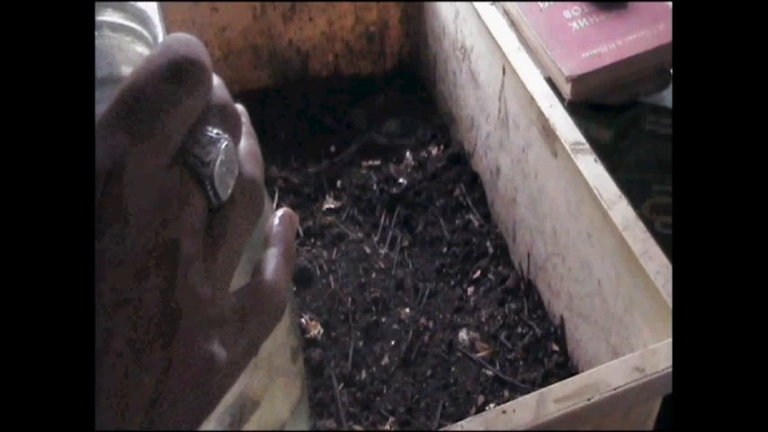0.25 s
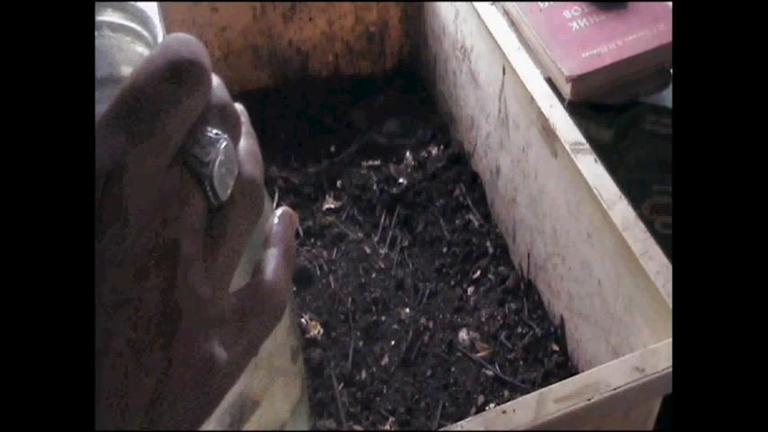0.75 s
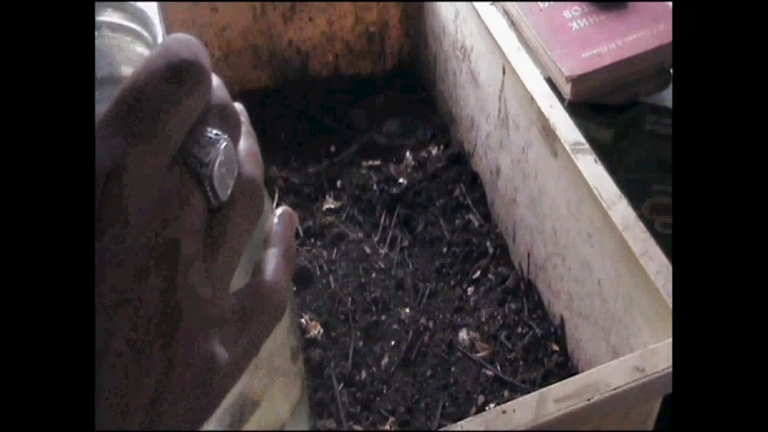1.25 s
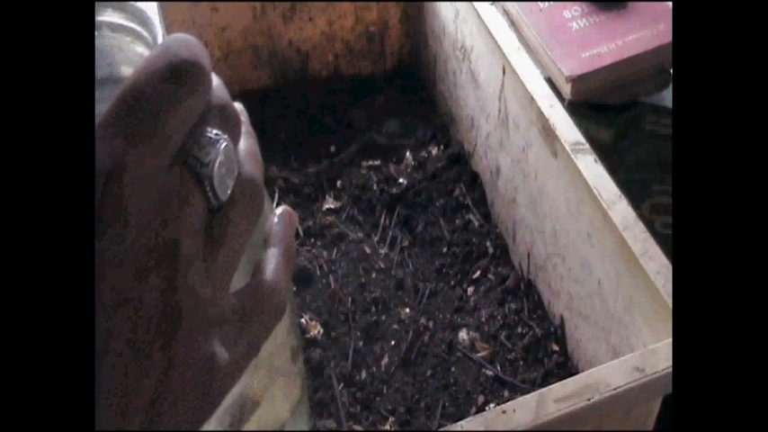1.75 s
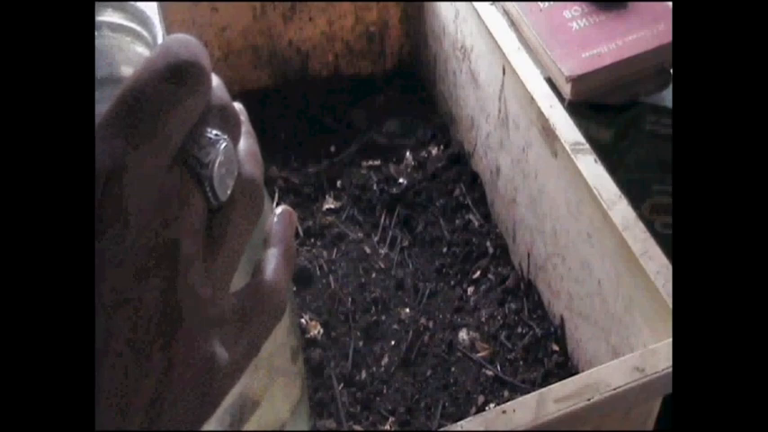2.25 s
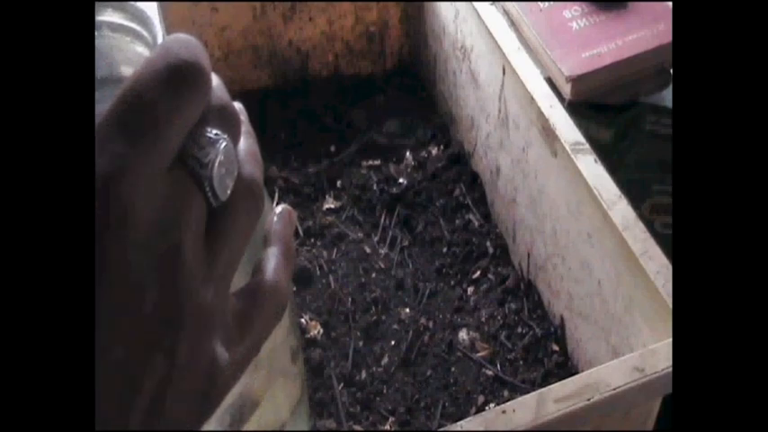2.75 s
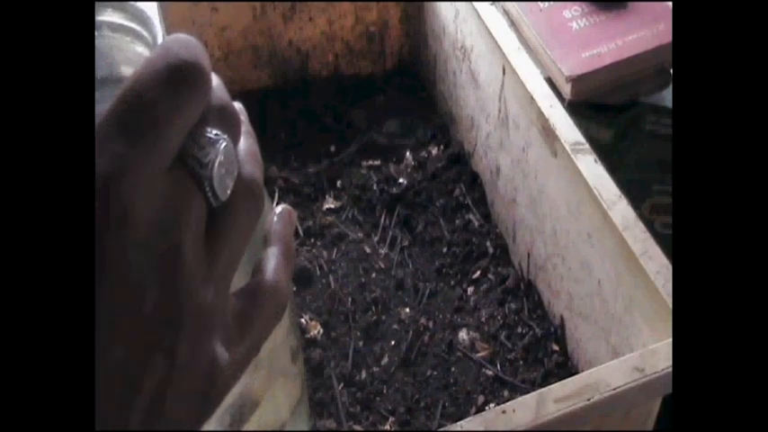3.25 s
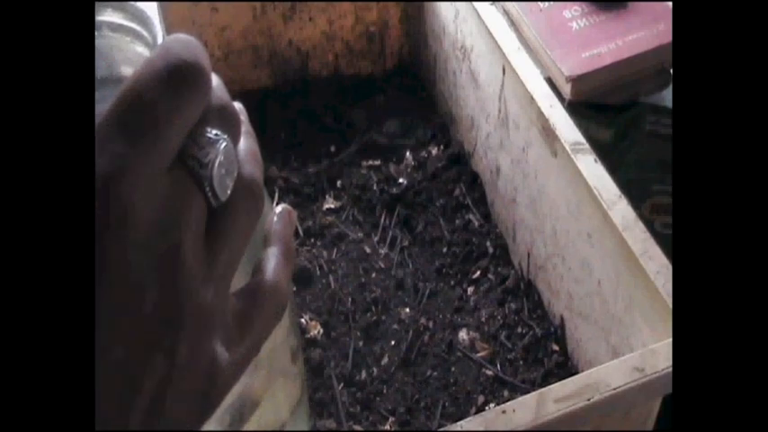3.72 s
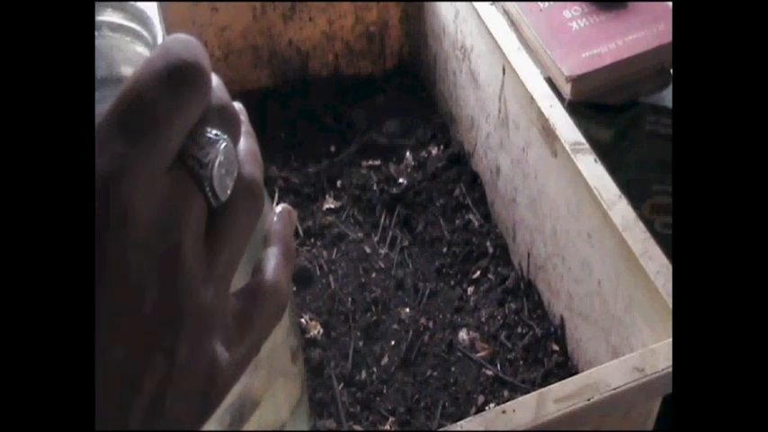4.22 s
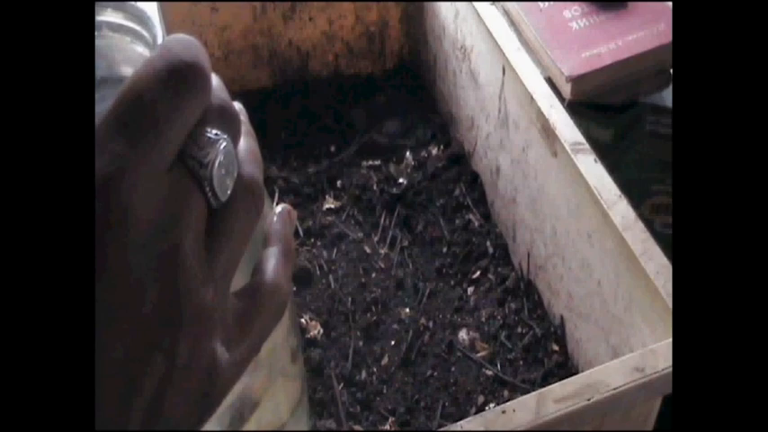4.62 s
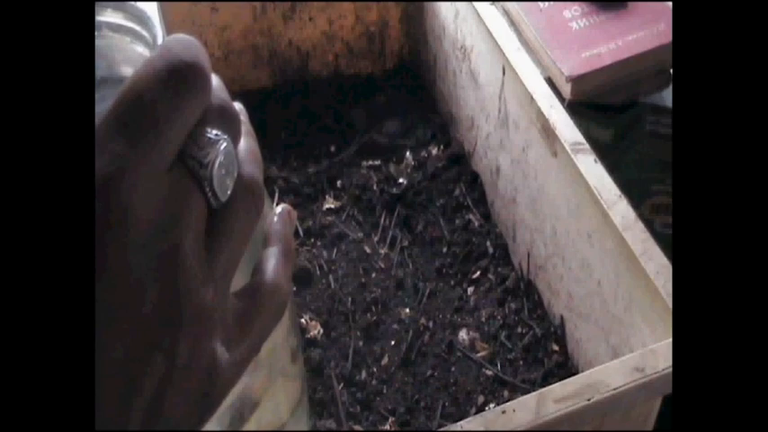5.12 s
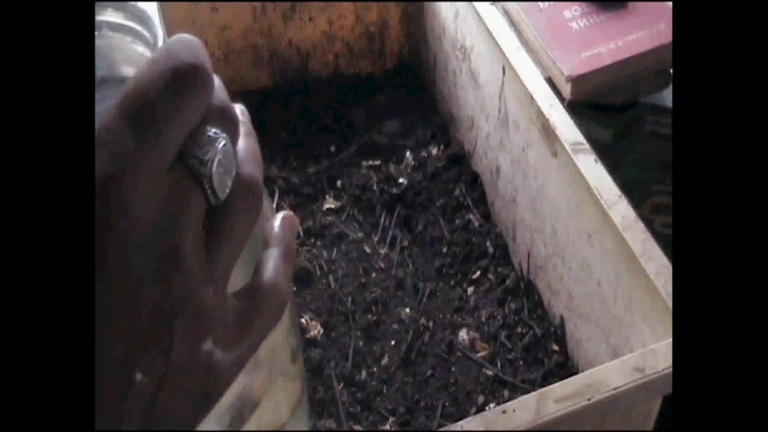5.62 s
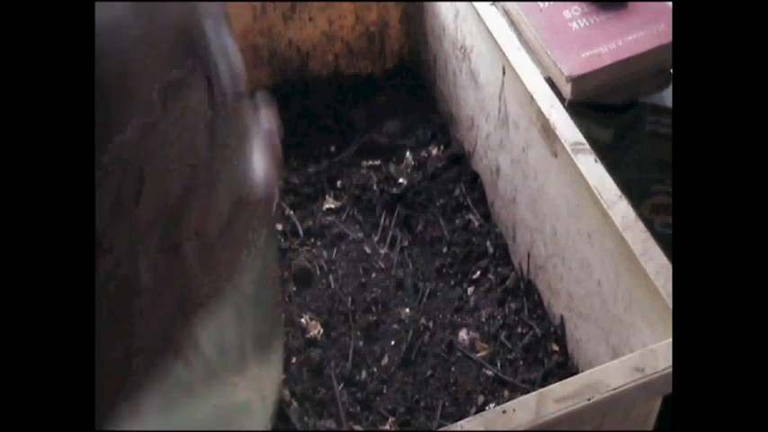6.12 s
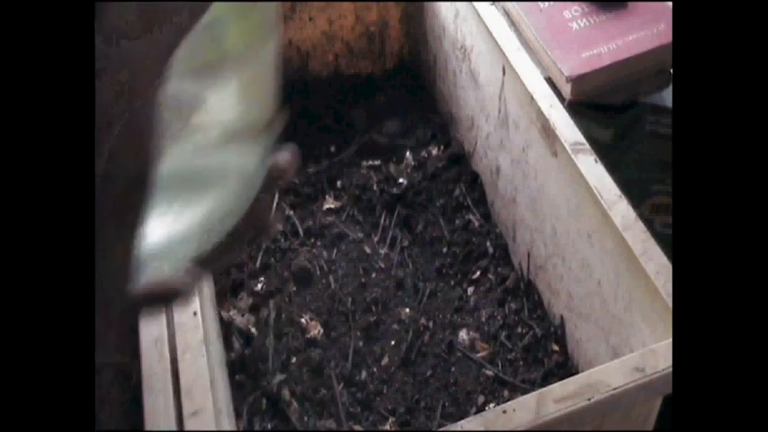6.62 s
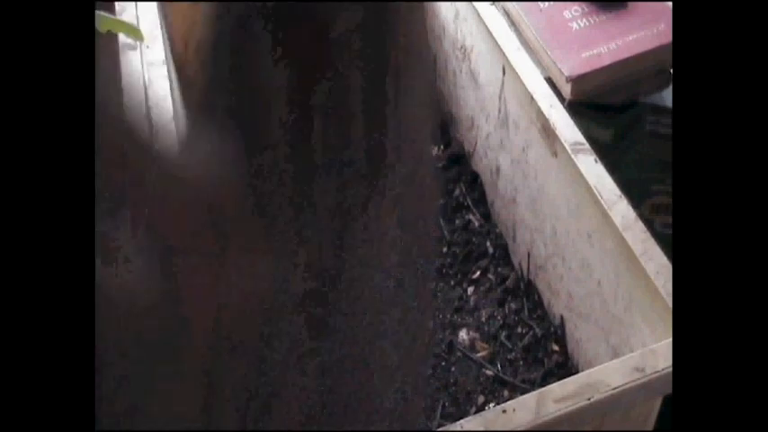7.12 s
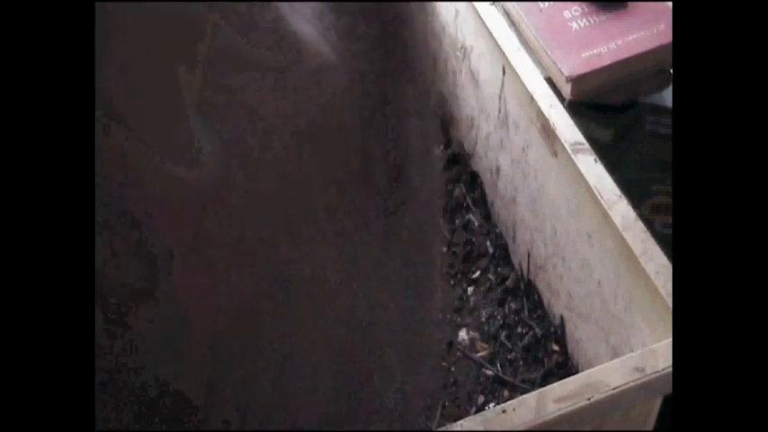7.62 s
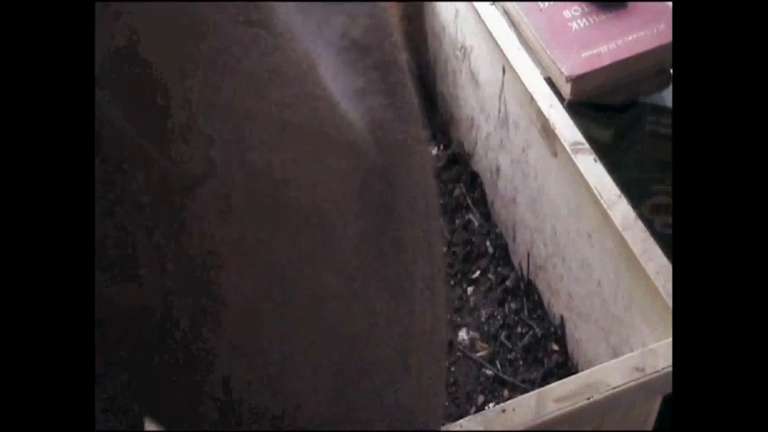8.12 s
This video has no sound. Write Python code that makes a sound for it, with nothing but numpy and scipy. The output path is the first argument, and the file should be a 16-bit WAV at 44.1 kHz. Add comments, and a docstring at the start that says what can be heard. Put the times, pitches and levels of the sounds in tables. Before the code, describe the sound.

Indoors, close to a box of damp soil, a faint bed of low rumble, hiss, fluttering motor whine and very thin high whistle runs throughout. From 0 to 1.6 s a weak fizz fades into lone ticks and tiny pips. A soft bump at 1.65 s and a duller one at 1.95 s lead into gushes of water: bright fizzing, crackling and sharp drip snaps to about 3.4 s, with short squeaks near 2.3-2.5 s. It thins to light seeping and ticks until 5 s. Stronger pours patter at 5.0-5.5 s, with a hollow plastic bottle boom at 5.27 s, and the brightest burst comes at 5.85-6.1 s with loud snaps, bumps and a squeak. Crackling drains away; clicks and squeaks follow at 7.2-7.4 s, a short hard ringing clink at 7.47 s, a soft thud at 7.77 s, then sparse drips to 8.3 s.

```python
"""Watering damp soil in a wooden box

Water from a plastic bottle soaks in close to a small camera indoors. Wet crumbs fizz and crackle as random
snaps and tone bursts that swell with each pour; strong pours patter, single drips snap and ring.
Shaped noise makes the bumps on the box, decaying modes the bottle's boom and a hard clink, glides the squeaks.
Under it lie noise rumble and hiss, a fluttering motor whine and a thin whistle.
"""
import sys
import numpy as np
from scipy import signal
from scipy.fft import rfft, irfft
from scipy.io import wavfile
from scipy.ndimage import uniform_filter1d

SR = 44100
rng = np.random.default_rng(int(sys.argv[2]) if len(sys.argv) > 2 else 0)


def store_wav(level_fs):
    """Save 16-bit WAV to argv[1]."""
    pcm = np.round(np.clip(np.atleast_2d(level_fs), -1, 1) * 32767)
    wavfile.write(sys.argv[1], SR, pcm.T.astype(np.int16))


N = 369116
T = np.arange(N) / SR

# colour of the microphone behind its port: (frequency [Hz], gain [dB])
PORT_RESPONSE = [(2200, 5.5), (2700, -11.5), (3400, 5), (3900, -3), (4500, 7.5), (5600, -7), (7200, -7.5),
                 (8100, 3.5), (9900, -11.5), (10400, -5), (10900, -9.5), (12300, 4), (14000, 8.5),
                 (15500, 1)]


def undb(db):
    """Decibels to gain."""
    return 10 ** (np.asarray(db) / 20)


def unit(x):
    """Scale to rms 1."""
    return x / np.sqrt(np.mean(x ** 2))


def seconds(length_s):
    """Time axis of a short sound."""
    return np.arange(int(length_s * SR)) / SR


def fade(t, t60):
    """Exponential decay, 60 dB down after t60."""
    return np.exp(-np.log(1000) * t / t60)


def add(out, start_s, x):
    """Mix x into out at start_s."""
    i = max(int(start_s * SR), 0)
    out[i:i + len(x)] += x[:max(N - i, 0)]


def colour(x, points, size=4096):
    """Causal minimum-phase filter through (Hz, dB) points, by folding the cepstrum."""
    hz, db = np.transpose(points)
    bin_hz = np.maximum(np.arange(size // 2 + 1) * SR / size, 1)
    gain_db = np.interp(np.log(bin_hz), np.log(hz), db)
    cepstrum = irfft(np.log(undb(gain_db)))
    cepstrum[1:size // 2] *= 2
    cepstrum[size // 2 + 1:] = 0
    impulse = irfft(np.exp(rfft(cepstrum)))
    return signal.fftconvolve(x, impulse)[:len(x)]


def echo(x, t60_s, wet_db):
    """The sound plus a diffuse, decaying noise tail of reflections."""
    t = seconds(t60_s)
    tail = rng.standard_normal(len(t)) * fade(t, t60_s) * (t > t60_s / 20)
    tail /= np.linalg.norm(tail)
    return x + undb(wet_db) * signal.fftconvolve(x, tail)[:N]


def background(whine_db=-74, flutter_hz=39.7, flutter_rad=0.94, wander_rms_hz=9):
    """Room rumble and microphone hiss are coloured noise; the camera adds a motor whine and a whistle."""
    # room noise spectrum: (frequency [Hz], relative level [dB])
    room_tone = [(25, -2.5), (55, -14), (79, 1.5), (105, -11), (145, -18.5), (220, -4), (300, 2),
                 (420, -6.5), (800, -11.5), (1500, -11), (2000, -13), (2600, -26.5), (5000, -34)]
    # motor pitch: (time [s], frequency [Hz])
    motor_pitch = [(0, 1857), (2, 1844), (3.6, 1818), (5, 1811), (7, 1822), (8.3, 1840)]
    rumble_db, hiss_db, whistle_db = -67, -70, -67.0
    whistle_hz, slips_per_s, slip_turns = 14203, 50, .42

    rumble = undb(rumble_db) * unit(colour(rng.standard_normal(N), room_tone))
    hiss = undb(hiss_db) * unit(colour(rng.standard_normal(N), PORT_RESPONSE))

    wander_hz = wander_rms_hz * unit(uniform_filter1d(rng.standard_normal(N), size=300))
    whine_hz = np.interp(T, *np.transpose(motor_pitch)) + wander_hz
    flutter = flutter_rad * np.sin(2 * np.pi * flutter_hz * T)
    whine = undb(whine_db) * unit(np.sin(2 * np.pi * np.cumsum(whine_hz) / SR + flutter))

    # smoothing across each phase slip makes the whistle dip briefly
    slips = np.exp(2j * np.pi * slip_turns * np.floor(slips_per_s * T))
    slips = uniform_filter1d(slips, size=160)
    whistle = undb(whistle_db) * unit(np.real(slips * np.exp(2j * np.pi * whistle_hz * T)))
    return rumble + hiss + whine + whistle


def flow():
    """Gains of the fine fizz and coarse crackle: gushes swell, hold and drain, adding in power over a seepage."""
    # gushes reaching the soil: (start [s], length [s], fine fizz level [dB], coarse crackle level [dB])
    gushes = [(-.05, 0.36, -70, -79), (1.91, 0.33, -61, -72), (2.227, 0.24, -63, -76),
              (2.568, .19, -57, -69), (2.825, 0.25, -62, -71.5), (3.083, 0.3, -56, -64.5),
              (3.565, 0.079, -65, -78), (3.963, 0.12, -63, -74), (4.243, 0.13, -64.5, -75),
              (4.735, 0.17, -68, -86), (5.014, 0.21, -56.5, -61), (5.194, .22, -54.5, -59.5),
              (5.429, 0.17, -61, -66), (5.615, .22, -59, -71.5), (5.839, 0.13, -49.5, -55),
              (5.96, 0.16, -52.5, -58.5), (6.22, 0.17, -67, -79), (6.683, 0.18, -64.5, -75.5),
              (7.102, 0.095, -61.5, -78), (7.341, 0.086, -57.5, -74), (7.52, 0.34, -64, -75)]
    attack_s, release_t60_s = 0.049, 0.37
    drain_db, drain_t60_s = -11.5, 1.4  # weak remainder
    seep_fizz_db, seep_crackle_db = -80, -93

    fine_power, coarse_power = undb(seep_fizz_db) ** 2, undb(seep_crackle_db) ** 2
    for start_s, length_s, fizz_db, crackle_db in gushes:
        after_s = np.maximum(T - start_s - length_s, 0)
        swell = np.clip((T - start_s) / attack_s, 0, 1)
        drain = undb(drain_db) * fade(after_s, drain_t60_s)
        gush = swell * np.maximum(fade(after_s, release_t60_s), drain)
        fine_power = fine_power + (undb(fizz_db) * gush) ** 2
        coarse_power = coarse_power + (undb(crackle_db) * gush) ** 2
    return np.sqrt(fine_power), np.sqrt(coarse_power)


def ticking(rate_hz, spread_db, t60_s):
    """Envelope of random decaying snaps; its mean power stays even however sparse they are."""
    when, chance = rng.random((2, N))
    strength = undb(-spread_db * np.log(chance + .02))
    energy = (when < rate_hz / SR) * strength ** 2 / rate_hz
    return np.sqrt(signal.lfilter([1], [1, -fade(1 / SR, t60_s) ** 2], energy))


def grains(rate_hz, lo_hz, hi_hz, swell_s, spread_db, size=256):
    """Randomly timed tone bursts that swell and die within milliseconds: many small, a few large."""
    when, pitch, chance, turn = rng.random((int(rate_hz * N / SR), 4)).T[:, :, None]
    hz = np.minimum(lo_hz * (hi_hz / lo_hz) ** pitch, SR / 2)
    strength = undb(-spread_db * np.log(chance + .03))
    k = np.arange(size)
    age = k / SR / swell_s
    tone = np.sin(2 * np.pi * (hz * k / SR + turn))
    bursts = strength * tone * age * np.exp(-age)
    index = (when * N).astype(int) + k
    return np.bincount(index.ravel(), bursts.ravel(), N)[:N]


def soaking(fine, coarse, fizz_db=0, crackle_db=-3, bubbles_db=-3):
    """Air leaves the wet soil: water films snap in a bright fizz, larger pores crackle and ring lower."""
    busy_db, snaps_per_s, pores_per_s = -55, 340, 260  # rates when the fizz gain is busy_db

    # dense while water sinks in, lone ticks once it has drained
    busy = fine / undb(busy_db)
    snaps = rng.standard_normal(N) * ticking(snaps_per_s * busy, spread_db=4.5, t60_s=0.0076)
    cracks = rng.standard_normal(N) * ticking(pores_per_s * busy, spread_db=6.5, t60_s=0.009)

    fizz = colour(snaps, [(2000, -55), (5000, -11.0), (8000, 0.5), (13000, 2.5), (16000, -2.5)])
    crackle = colour(snaps + cracks, [(700, -23.5), (1800, -1.5), (3200, 5.0),
                                      (5500, 2.5), (9000, -15), (13000, -29)])
    bubbles = grains(rate_hz=300, lo_hz=2390, hi_hz=8400, swell_s=0.00032, spread_db=5.5)
    fizz, crackle, bubbles = (unit(colour(x, PORT_RESPONSE)) for x in (fizz, crackle, bubbles))
    pores = undb(crackle_db) * crackle + undb(bubbles_db) * bubbles
    return fine * undb(fizz_db) * fizz + coarse * pores


def splashing(coarse, hollow_db=-3):
    """Strong pours patter in larger, duller drops, and the sloshing sounds the hollow of the bottle."""
    full_gush_db, splash_db = -54.5, -56  # crackle gain of a full gush, splash level there
    slope = 2.03  # dB of splash per dB of crackle
    strength = undb(splash_db) * (coarse / undb(full_gush_db)) ** slope

    patter = grains(rate_hz=1700, lo_hz=1164, hi_hz=2460, swell_s=0.00079, spread_db=5.0)
    hollow = colour(rng.standard_normal(N), [(150, -35.5), (260, -11), (330, -5.5), (400, -13.0),
                                             (550, -17.0), (800, -26), (2000, -38)])
    return strength * (unit(colour(patter, PORT_RESPONSE)) + undb(hollow_db) * unit(hollow))


def squeaks(rough=0.062, overtone_db=-22):
    """Short, unsteady gliding tones with a weak octave."""
    # faint squeaks and pips: (time [s], length [s], start pitch [Hz], end pitch [Hz], level [dB])
    glides = [(0, .05, 4540, 4400, -61), (0.843, 0.07, 3870, 3570, -71.5), (1.302, 0.039, 4500, 4340, -69),
              (2.262, 0.022, 1380, 1390, -49.5), (2.365, 0.044, 887, 956, -57.5),
              (2.506, .08, 3420, 3350, -66.5), (2.537, 0.051, 1834, 1566, -51.5),
              (4.302, 0.13, 1360, 1340, -65.5), (4.584, .033, 1344, 1387, -61),
              (5.797, 0.043, 1113, 870, -50.5), (7.229, 0.0081, 3800, 3600, -43.5),
              (7.328, 0.14, 1132, 1305, -58.5), (7.407, 0.017, 4030, 3950, -51.5),
              (8.132, 0.043, 4300, 3730, -61)]
    out = np.zeros(N)
    for start_s, length_s, start_hz, end_hz, level_db in glides:
        u = seconds(length_s) / length_s
        waver = unit(uniform_filter1d(rng.standard_normal(SR // 4), size=50))[:len(u)]
        hz = (start_hz + (end_hz - start_hz) * u) * (1 + rough * waver)
        phase = 2 * np.pi * np.cumsum(hz) / SR
        tone = np.sin(phase) + undb(overtone_db) * np.sin(2 * phase)
        add(out, start_s, undb(level_db) * np.sin(np.pi * np.sqrt(u)) * tone)
    return out


def drips(snap_t60_s=0.0067, pop_t60_cycles=22, plop_hz=1850, plop_t60_cycles=10, rise_s=0.00031):
    """A film snaps, and the pore and the hollow beneath it ring for a few cycles."""
    # single drips and bursting bubbles, levels ahead of the trims below:
    # (time [s], snap level [dB], pop pitch [Hz], pop level [dB], low plop level [dB])
    drip_events = [(0.256, -46, 3560, -64, -59), (0.6675, -45, 4430, -64, -66),
                   (0.9833, -49.5, 4600, -58, -68), (1.3987, -48, 3200, -83, -78),
                   (2.113, -46, 4560, -53, -67), (2.3057, -31.5, 4530, -53.5, -72),
                   (2.6617, -29, 4330, -72, -72), (2.6887, -40, 3550, -48, -61),
                   (2.7151, -34, 4690, -46.5, -51.5), (2.7567, -33.5, 4160, -51, -45),
                   (2.964, -43, 3520, -51, -53), (3.1058, -27, 4570, -55, -68),
                   (3.1862, -34.5, 4430, -54, -62), (3.245, -30.5, 4500, -59, -49),
                   (3.257, -36, 3500, -44.5, -59), (3.3048, -38, 4630, -45.5, -44),
                   (3.6123, -42.5, 4630, -50.5, -73), (3.711, -39.5, 4440, -74, -68),
                   (3.7765, -43.5, 5030, -52, -79), (3.916, -45, 2880, -84, -73),
                   (4.03, -45, 3700, -71, -67), (4.201, -36.5, 3740, -58, -69),
                   (4.947, -41.5, 2830, -81, -59), (5.044, -34, 4570, -55, -46.5),
                   (5.092, -36.5, 4700, -56, -65), (5.1358, -38, 3880, -39, -46),
                   (5.3312, -39, 4180, -40.5, -68), (5.3508, -28.5, 4760, -38.5, -40),
                   (5.426, -36, 3620, -37, -73), (5.6427, -34, 3080, -66, -73),
                   (5.764, -45, 4530, -72, -78), (5.9607, -27, 4860, -46, -57),
                   (6.017, -31, 4300, -49, -55), (6.04, -23, 3140, -50.5, -42.5),
                   (6.7683, -37, 3670, -80, -60), (7.2695, -40.5, 3760, -57, -53.5),
                   (7.831, -33.5, 4670, -70, -63), (7.9708, -37.5, 4740, -86, -66)]
    snap_trim_db, pop_trim_db, plop_trim_db = 1, 5, 3
    snap_spectrum = [(700, -23.5), (1800, -13.0), (7000, -1.5), (13000, 4.5)]

    out, t = np.zeros(N), seconds(.03)
    attack = 1 - np.exp(-t / rise_s)
    for start_s, snap_db, pop_hz, pop_db, plop_db in drip_events:
        snap = colour(rng.standard_normal(len(t)) * attack * fade(t, snap_t60_s), snap_spectrum)
        snap = colour(snap, PORT_RESPONSE)
        pop = np.sin(2 * np.pi * pop_hz * t) * attack * fade(pop_hz * t, pop_t60_cycles)
        low_hz = plop_hz * (1 + 0.089 * rng.standard_normal())
        plop = np.sin(2 * np.pi * low_hz * t) * attack * fade(low_hz * t, plop_t60_cycles)
        for part, peak_db in ((snap, snap_db + snap_trim_db),
                              (pop, pop_db + pop_trim_db),
                              (plop, plop_db + plop_trim_db)):
            add(out, start_s, undb(peak_db) * part / abs(part).max())
    return out


def bumps(scrape_rise_s=0.0009, thud_rise_s=0.0042, scrape_octaves=2.03, thud_band_hz=(172, 370)):
    """Soft blows shake the filled box: the contact scrapes, then the body thuds, both as band-passed noise."""
    # bumps, levels ahead of the envelope:
    # (time [s], scrape level [dB], scrape centre [Hz], thud level [dB], t60 [s])
    blows = [(1.648, -53.5, 620, -68, 0.099), (1.951, -47.5, 1170, -44, 0.33),
             (2.263, -59, 1900, -46, 0.096), (2.448, -74, 1000, -47, 0.056), (2.822, -73, 1000, -47, 0.052),
             (5.271, -41.5, 860, -41, 0.14), (5.803, -60, 1000, -55, 0.093), (5.906, -47, 1450, -53, 0.1),
             (6.584, -76, 1000, -53, 0.1), (7.768, -51, 880, -51, 0.39)]
    # colour of the filled box: (frequency [Hz], gain [dB])
    box_response = [(120, -35.5), (200, 5.5), (280, 7), (400, 2.5), (700, -10), (1200, -7), (1900, -10.5),
                    (2700, -28.5), (3500, -10.5), (6000, -20)]
    thud_lag_s = 0.01602  # the body answers after the contact

    out, t = np.zeros(N), seconds(.5)
    for start_s, scrape_db, centre_hz, thud_db, t60_s in blows:
        scrape_band_hz = centre_hz * 2 ** (scrape_octaves * np.array([-.5, .5]))
        for lag_s, level_db, band_hz, rise_s in ((0, scrape_db, scrape_band_hz, scrape_rise_s),
                                                 (thud_lag_s, thud_db, thud_band_hz, thud_rise_s)):
            band = signal.butter(2, band_hz, "band", fs=SR, output="sos")
            shake = colour(rng.standard_normal(len(t)), box_response)
            shake = unit(signal.sosfilt(band, shake))
            envelope = (1 - np.exp(-t / rise_s)) * fade(t, t60_s)
            add(out, start_s + lag_s, undb(level_db) * shake * envelope)
    return out


def struck(blows, modes, crack_db, crack_t60_s, rise_s):
    """A blow makes a short contact noise and rings the modes; opposed neighbours swell and beat."""
    crack_spectrum = [(300, -13), (2000, -2.0), (2700, -14), (4600, 5), (6000, -22), (15000, 2)]
    out, t = np.zeros(N), seconds(.5)
    ring = np.zeros(len(t))
    for k, (hz, mode_db, t60_s) in enumerate(modes):
        ring += (-1) ** k * undb(mode_db) * np.sin(2 * np.pi * hz * t) * fade(t, t60_s)
    for start_s, level_db in blows:
        crack = unit(colour(rng.standard_normal(len(t)), crack_spectrum))
        crack = undb(crack_db) * crack * fade(t, crack_t60_s)
        add(out, start_s, undb(level_db) * (ring + crack) * (1 - np.exp(-t / rise_s)))
    return out


def bottle_boom():
    """The bottle's wall springs back and rings its low modes; the boom carries no deep bass."""
    # wall springs back: (time [s], level [dB])
    flexes = [(5.271, -29.5), (5.296, -32)]
    # bottle modes: (frequency [Hz], relative level [dB], t60 [s])
    bottle_modes = [(289.2, -4.5, 0.32), (320, -2, 0.14), (393, -0.5, 0.026), (484, -23.5, .12),
                    (529, -18.5, 0.33), (626, -17, 0.12)]
    boom = struck(flexes, bottle_modes, crack_db=-35, crack_t60_s=0.036, rise_s=0.0012)
    return signal.sosfilt(signal.butter(4, 215, "high", fs=SR, output="sos"), boom)


def hard_clink():
    """A hard object is struck and rings its modes."""
    # strikes: (time [s], level [dB])
    strikes = [(7.466, -31), (7.475, -42)]
    # object modes: (frequency [Hz], relative level [dB], t60 [s])
    hard_modes = [(1161, -5.5, 0.18), (1183, -4, 0.15), (1976, -9, 0.32), (2047, 3, 0.092),
                  (2325, -12, 0.19), (2670, -22, 0.16), (3065, -19.5, 0.1), (4400, -22.5, 0.2),
                  (4430, -11, 0.057), (4630, -21, 0.06)]
    return struck(strikes, hard_modes, crack_db=-11.5, crack_t60_s=0.14, rise_s=0.00041)


def scene():
    """Water echoes briefly in the box, knocks ring on in the room; one microphone feeds both channels."""
    fine, coarse = flow()
    water = echo(soaking(fine, coarse) + splashing(coarse) + drips(), t60_s=0.043, wet_db=-5.5)
    small = echo(squeaks() + bumps(), t60_s=0.3, wet_db=-11.0)
    knocks = echo(bottle_boom() + hard_clink(), t60_s=.3, wet_db=-16)
    return np.tile(background() + water + small + knocks, (2, 1))


def record(dry):
    """The camera cuts the top; each channel rests on a small constant offset."""
    # constant offset of each channel: (left, right) [full scale]
    channel_offset = [.0113, .0291]
    low_pass = signal.ellip(10, .2, 70, 15800, fs=SR, output="sos")
    return signal.sosfilt(low_pass, dry) + np.array(channel_offset)[:, None]


dry = scene()
out = record(dry)
store_wav(out)
```